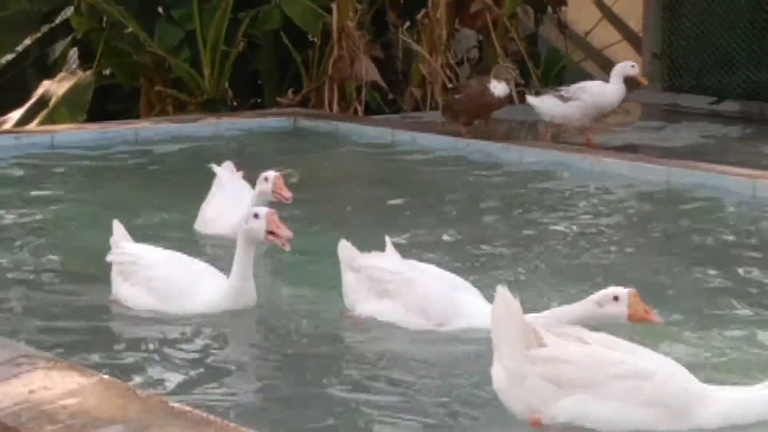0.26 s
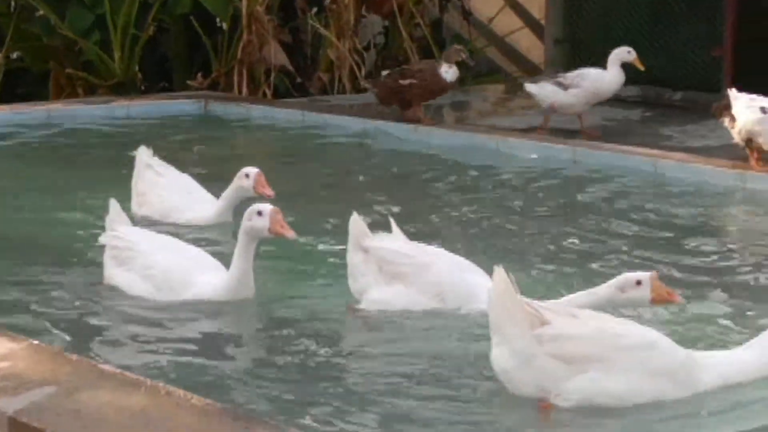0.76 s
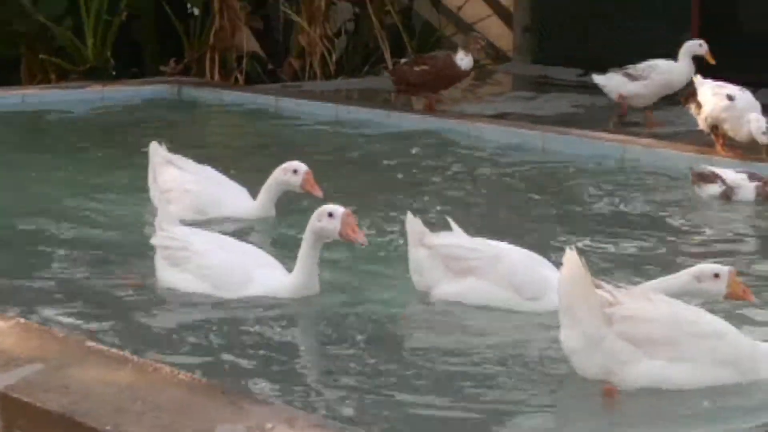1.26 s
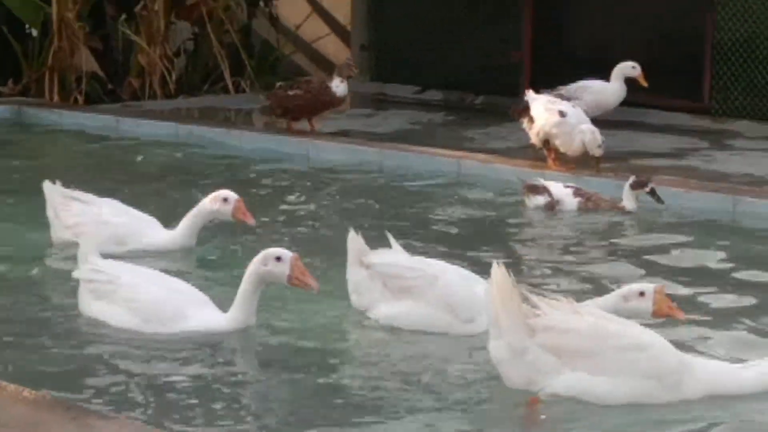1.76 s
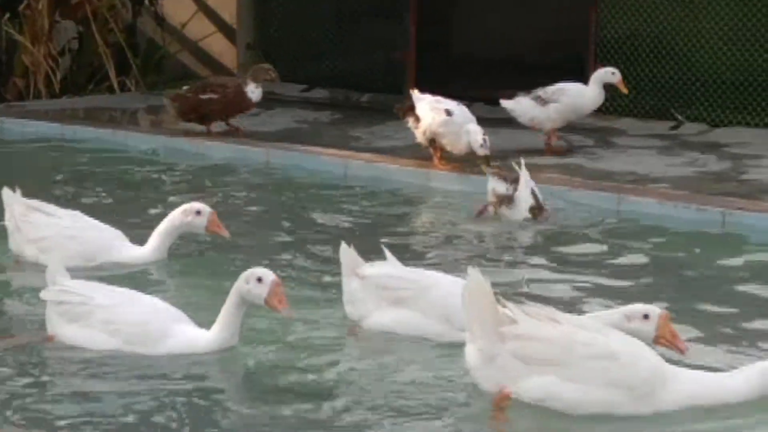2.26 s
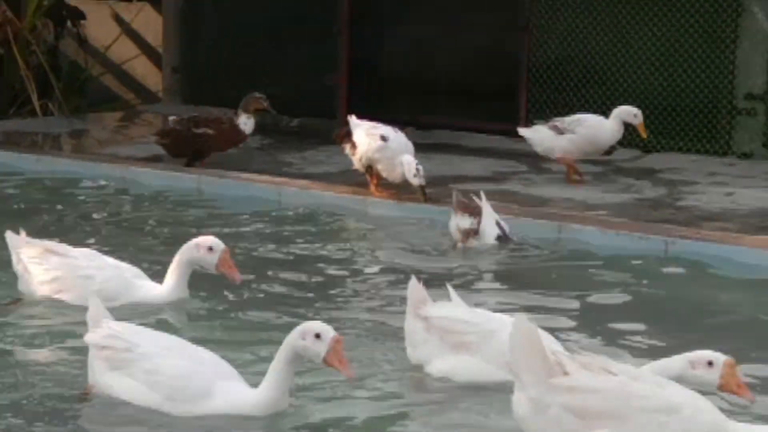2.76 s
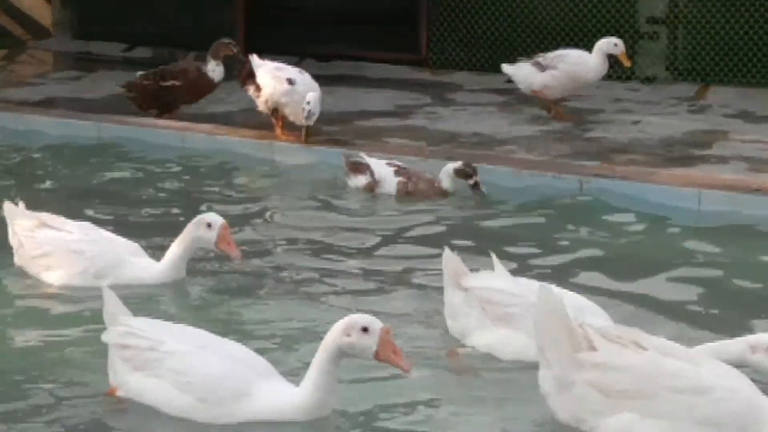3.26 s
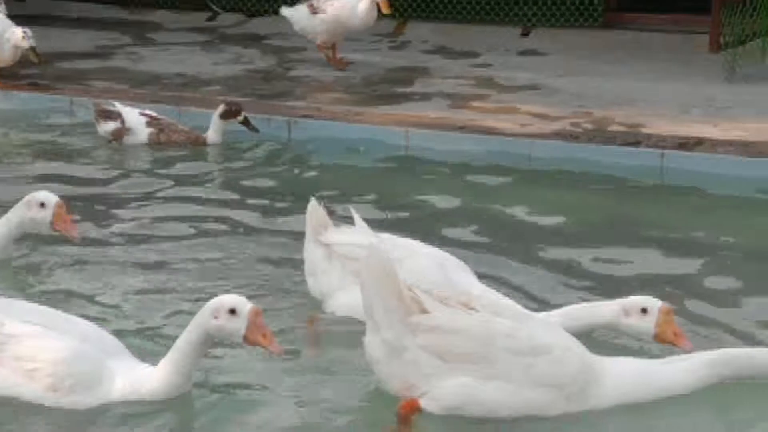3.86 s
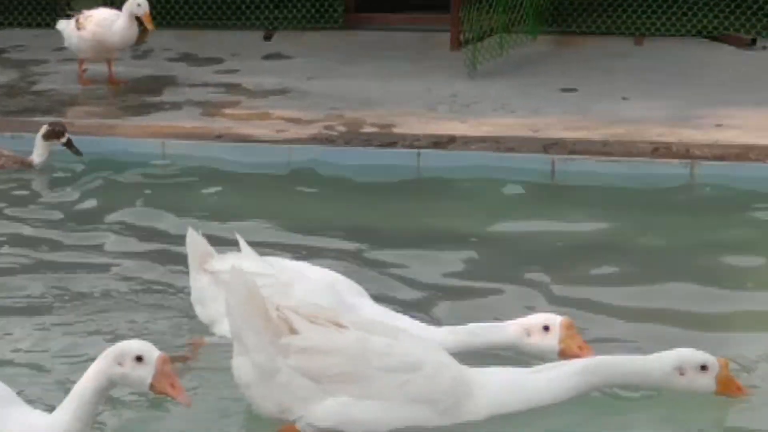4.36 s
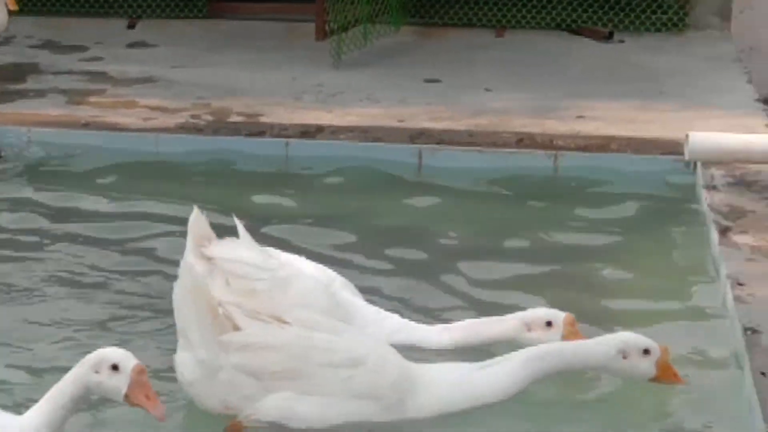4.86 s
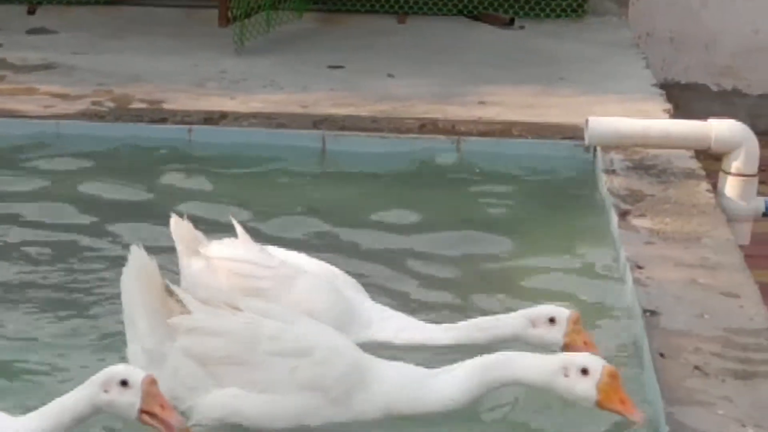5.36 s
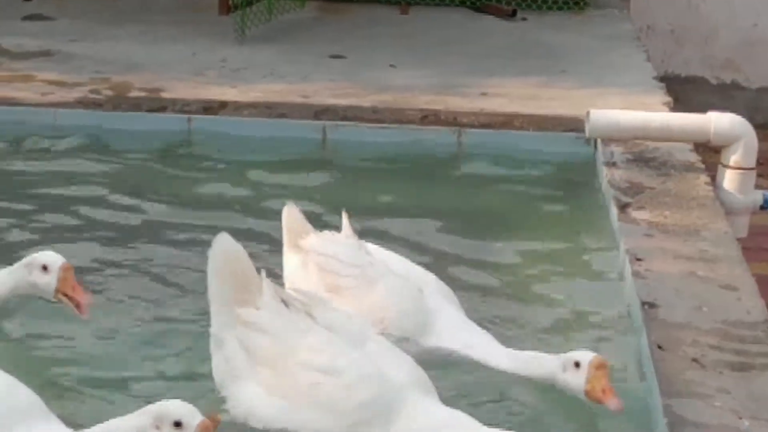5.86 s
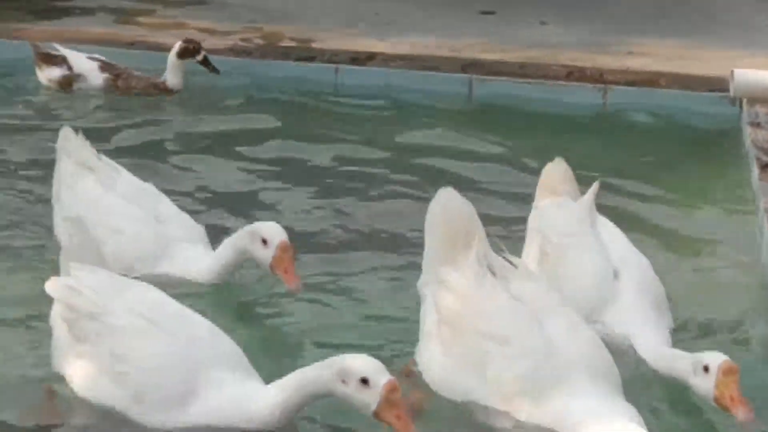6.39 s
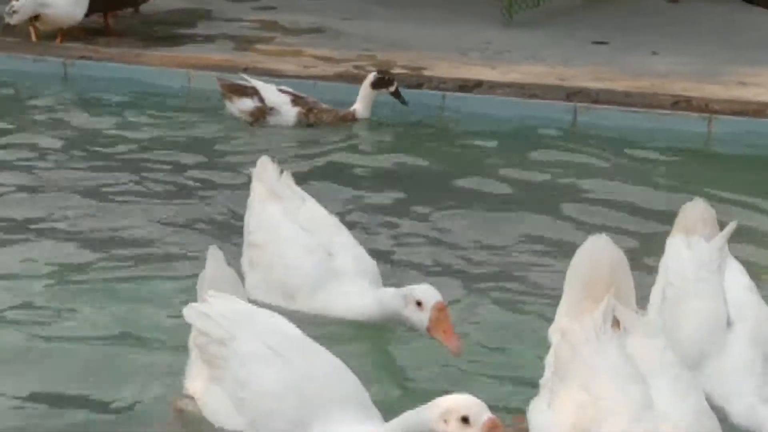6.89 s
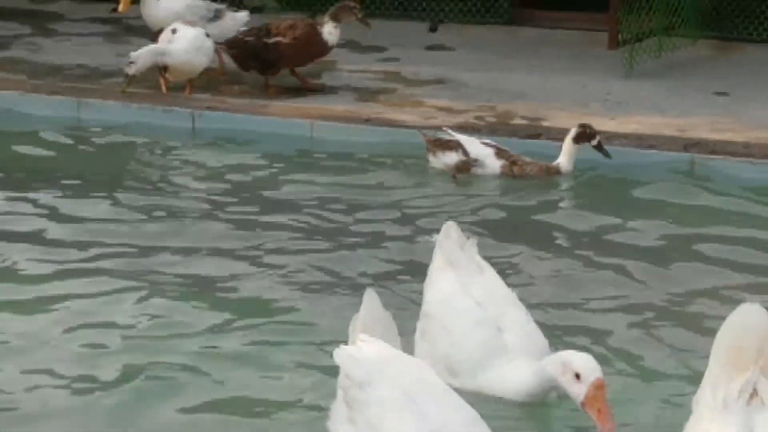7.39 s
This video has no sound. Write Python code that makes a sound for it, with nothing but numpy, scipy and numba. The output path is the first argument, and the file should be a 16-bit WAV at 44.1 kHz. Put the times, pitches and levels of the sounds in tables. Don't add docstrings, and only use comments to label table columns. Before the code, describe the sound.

Geese at a walled concrete pond give rasping, nasal honks close to a small microphone, loudest ones slightly overloaded. Scattered calls come first, with softer lowing from farther birds and a sharp click near the middle. Then hoarse squeals, barks and yelps crowd together. A low engine throb, faint outdoor murmur and light breeze lie underneath, with short yard echoes.

```python
import sys
import numpy as np
from scipy import signal
from scipy.fft import rfft, irfft, next_fast_len
from scipy.io import wavfile
from scipy.ndimage import uniform_filter1d, map_coordinates
from numba import njit

SR = 44100
rng = np.random.default_rng(int(sys.argv[2]) if len(sys.argv) > 2 else 0)


def log_audio(samples):
    frames = np.atleast_2d(samples).T
    limited = np.clip(frames, -1, 1)
    pcm = np.round(limited * 32767).astype(np.int16)
    wavfile.write(sys.argv[1], SR, pcm)


def invert_db(x):
    u = np.asarray(x, float) / 20
    return 10 ** u


N = 336483
TIME = np.arange(N) / SR

# [f/Hz, level/dB per Hz]
THROAT_HISS = [(1470, -4), (2500, 5.5), (3020, 2.5), (4000, 4), (4460, 1), (5260, 0.5), (6390, -1.5),
               (9090, -6), (9830, -11), (15100, -16.5), (16200, -28)]


def unit(x):
    return x / np.sqrt(np.mean(x ** 2) + 1e-20)


def level(x, span):
    power = uniform_filter1d(uniform_filter1d(x * x, size=span), size=span)
    return x / np.sqrt(np.abs(power) + 1e-12)


def along(points, hz):
    f, v = np.transpose(points)
    return np.interp(np.log(hz + 1), np.log(f + 1), v)


def curves(rows):
    s, *cols = np.transpose(rows)
    return [np.interp(TIME, s, c) for c in cols]


def wobble(rate):
    return map_coordinates(rng.standard_normal(int(N * rate / SR) + 4), [TIME * rate])


def filtered(x, response):
    m = next_fast_len(N + SR // 2)
    return irfft(rfft(x, m) * response(np.fft.rfftfreq(m, 1 / SR)), m)[..., :N]


def modes(table):
    def response(f):
        total = 0
        for k, (c, w, db) in enumerate(table):
            total = total + (-1) ** k * invert_db(db) * 1j * f * w / (c * c - f * f + 1j * f * w)
        return total
    return response


def patchy(x, depth_db, bins, frames):
    z = signal.stft(x, nperseg=512)[2]
    field = uniform_filter1d(uniform_filter1d(rng.standard_normal(z.shape), bins, 0), frames, 1)
    return signal.istft(z * invert_db(depth_db * unit(field)), nperseg=512)[1][:N]


@njit
def resonate(x, turn, damp):
    y = np.zeros(len(x))
    for i in range(2, len(x)):
        y[i] = x[i] - x[i - 2] + 2 * damp * np.cos(turn[i]) * y[i - 1] - damp * damp * y[i - 2]
    return y


def ring(x, hz, width_hz):
    return resonate(x, 2 * np.pi * hz / SR, np.exp(-np.pi * width_hz / SR))


def cavity(x, hz, width_hz, skirt_hz):
    return level(ring(ring(x, hz, width_hz), hz, skirt_hz), 900)


@njit
def tube(x, delay, echo):
    y = x.copy()
    for i in range(400, len(x)):
        y[i] += echo * y[i - delay[i]]
    return y


def air():
    # [f/Hz, level/dB per Hz]
    air_spectrum = [(15, -42), (25, -41), (196, -4.5), (479, -13), (739, -1), (969, -8), (1340, -3.5),
                    (1760, -11), (2500, -12), (3190, -12.5), (3650, -22), (4180, -27.5), (9950, -29),
                    (16200, -30)]
    # [t/s, level/dB, width/s]
    gusts = [
        (.36, -43, 0.044),
        (3.4, -28, .25),
        (5.5, -65.5, 0.25),
        (6.049, -51, 0.24),
        (6.761, -52.5, 0.25),
        (7.199, -22, 0.42),
    ]
    murmur = patchy(rng.standard_normal(N), depth_db=5, bins=2, frames=14)
    pair = np.array([unit(murmur), rng.standard_normal(N)])

    def share(f):
        low = 1 / (1 + (f / 4000) ** 6)
        return invert_db(along(air_spectrum, f)) * np.sqrt([low, 1 - low])

    hiss = unit(filtered(pair, share).sum(axis=0))
    buffet = unit(filtered(rng.standard_normal(N), lambda f: modes([(85, 60, 0)])(f) ** 2))
    strength = invert_db(-41) + sum(invert_db(db) * np.exp(-((TIME - s) / w) ** 2) for s, db, w in gusts)
    breeze = strength * invert_db(0.91 * wobble(8.2) - 20.5) * buffet
    return invert_db(-46 + 0.14 * wobble(4.3)) * hiss + breeze


def engine():
    # [t/s, firing rate/Hz, level/dB]
    running = [(0.0, 20.3, -76), (0.4, 24, -36), (0.778, 23, -39), (1.039, 21.2, -36.5), (1.572, 18, -33),
               (2.612, 27, -34.5), (3.288, 26, -29.5), (3.969, 18.4, -38.5), (4.292, 18, -32.5),
               (4.798, 27, -32), (5.189, 21.3, -33.5), (5.61, 23.6, -34), (6.668, 37, -28.5),
               (7.63, 34, -57)]
    # [f/Hz, width/Hz, level/dB]
    exhaust = [(120, 35, 9), (167.4, 100, 6), (211, 32.6, 9), (333, 100, -3.5)]
    rate, db = curves(running)
    firings = np.cumsum(rate * (1 + 0.0328 * wobble(14))) / SR
    thuds = np.diff(np.floor(firings), prepend=0) * invert_db(3.1 * wobble(25))
    pipe = filtered(filtered(thuds, modes(exhaust)), modes([(181, 180, 0)]))
    return invert_db(db - 10.0) * level(pipe, 9000)


def drops():
    # [t/s, peak level/dB]
    ticks = [(0.709, -14.5), (0.7397, -39), (0.753, -24), (0.7831, -30), (0.8071, -30), (0.881, -30),
             (0.914, -24), (1.0183, -15), (1.093, -24), (2.711, -19), (2.715, 2), (2.725, -8),
             (2.7522, -15), (2.765, -16), (6.2916, -42.5), (6.395, -32)]
    out, t = np.zeros(N + SR), np.arange(SR // 40) / SR
    pitches = 8300 * invert_db(1.4 * rng.standard_normal(len(ticks)))
    for (s, db), hz in zip(ticks, pitches):
        click = rng.standard_normal(len(t)) * (invert_db(-60 * t / 0.0011) + 0.2 * invert_db(-60 * t / 0.15))
        bubble = np.sin(2 * np.pi * hz * t) * invert_db(-60 * t / 0.0042)
        out[round(s * SR):][:len(t)] += invert_db(db) * (.37 * click + .36 * bubble)
    return filtered(out[:N], lambda f: (1j * f / (2000 + 1j * f)) ** 2 / (1 + (f / 13000) ** 4))


def yard(x):
    # [f/Hz, time to fall 60 dB/s]
    decay = [(300, 0.27), (1500, 0.31), (4000, 0.28), (7000, .2), (12000, .11)]
    hz, t, z = signal.stft(rng.standard_normal(SR * 3 // 4), SR, nperseg=256)
    tail = signal.istft(z * invert_db(-60 * t / along(decay, hz)[:, None]), SR, nperseg=256)[1]
    return signal.fftconvolve(np.pad(x, (400, 0)), tail / np.linalg.norm(tail))[:N]


def played(calls, edge):
    gate = 0
    for c in calls:
        opening, closing = (TIME - c[0][0]) / .008, (c[-1][0] - TIME) / edge
        gate = gate + np.clip(np.minimum(opening, closing) + .5, 0, 1)
    return [np.minimum(gate, 1)] + curves(np.concatenate(calls))


def squeals():
    # [t/s, pitch f/Hz, level/dB, brightness/dB per octave]
    squeal_calls = [
        [(0.58, 787, -53, -10), (0.608, 826, -34, -8), (0.812, 810.6, -37, -10), (0.83, 807, -55, -12),
         (0.95, 816, -45.5, 0)],
        [(4.13, 981, -26.5, -5), (4.23, 960, -23.5, -10), (4.296, 977, -20, -20), (4.37, 1034, -20.5, -7.5),
         (4.416, 1081, -24, -5), (4.46, 990, -17, -17)],
        [(4.47, 962, -15.5, -15), (4.486, 978, -13, -22), (4.53, 1085, -22, -67), (4.58, 1018, -9.5, -17)],
        [(5.075, 1150, -20.5, -9.5), (5.11, 1111, -20, -2), (5.17, 1131, -22, -1), (5.212, 1100, -19.5, -3.5),
         (5.25, 1166, -14.5, -4), (5.33, 1117, -14, -5.5), (5.444, 1059, -27, 2), (5.47, 1124, -8, -13)],
        [(6.035, 1136, -12, -1.5), (6.07, 1141, -19, -11), (6.088, 1142, -11, -3), (6.1, 1181, -23, -4),
         (6.126, 1203, -35, -8), (6.135, 1283, -8, -8.5), (6.146, 1254, -43, -1), (6.16, 1194, -53, -9)],
    ]
    # [multiple of the pitch, level/dB]
    overtones = [(1, 2.5), (2, -9), (3, -17), (4, -23), (5, -32), (6, -29), (7, -37), (8, -36), (9, -37),
                 (10, -40), (11, -40), (12, -42), (13, -45)]
    # [t/s, depth 0..1]
    flutter_depth = [(.96, 0), (4.13, .6), (4.3, .35), (4.58, .35), (5.21, .03), (5.25, .5), (5.3, .65),
                     (5.47, .9), (6.03, .6), (6.16, .7)]
    gate, pitch, db, tilt_db = played(squeal_calls, .03)
    depth = curves(flutter_depth)[0]
    turn = 2 * np.pi * np.cumsum(pitch * (1 + 0.00483 * wobble(150) + 0.0029 * wobble(30))) / SR
    flutter = turn / 6 + .4 * wobble(60)
    drag = depth * (.6 * np.sin(flutter) + (.1 + .25 * depth) * wobble(130))

    def mouth(hz):
        palate = 3 / (1 + ((hz - 3350) / 180) ** 2)
        return 1 + 3.2 / (1 + ((hz - 2030) / 90) ** 2) + depth * palate

    stack = 0
    for k, db_k in overtones:
        gain = invert_db(db_k + (tilt_db + 5.0) * np.log2(k) + 2.53 * wobble(90))
        stack = stack + mouth(k * pitch) * gain * np.sin(k * turn - k ** 1.19 * drag)
    stack += invert_db(-14) * np.exp(-((depth - .2) / 0.1) ** 2) * np.sin(turn / 2)
    breath = filtered(rng.standard_normal(N), lambda f: invert_db(along(THROAT_HISS, f)) / (1 + (f / 3800) ** 4))
    hiss = unit(breath) * (1 + np.cos(turn))
    beating = level(np.exp(depth * np.cos(flutter)), 900)
    return gate * invert_db(db) * beating * (stack + invert_db(tilt_db - 36 + 18 * depth) * hiss)


def phrase(rows, swell_db_s, held, fade_db, onset, end, beak_hz, neck_db, pipe_db, rasp_db, closing_db,
           crack_db=-60, crack_lead_s=0, rasp_yield=.19, early_glide=.75):
    shut, wide, last = beak_hz
    closing = np.array([0, 0.06, 0.11, 0.37, 0.95])
    glide = np.array([onset, onset + early_glide * (1 - onset), 1, 1 + .4 * (end - 1), end])
    beak = [shut, shut + .68 * (wide - shut), wide, (wide + last) / 2, last]
    yields = (0.84, 0.47, rasp_yield)
    calls = []
    for start, swell, length, peak_db, pitch in rows:
        rest = length - swell
        s = start + np.array([0, swell / 2, swell, swell + held * rest, length])
        rise_db = swell_db_s * swell
        effort = peak_db - np.array([rise_db, .43 * rise_db, 0, fade_db / 8, fade_db])
        tract = [db - give * (effort + 20) + extra * closing
                 for db, give, extra in zip((neck_db, pipe_db, rasp_db), yields, closing_db)]
        cracked = np.clip((s - start - swell + crack_lead_s) / 0.0033, -1, 1)
        crack = crack_db + 0.25 * (peak_db + 8) + 12 * (cracked - 1)
        calls.append(np.transpose([s, effort, pitch * glide, beak, *tract, crack]))
    return calls


def flock(calls, facing=((0, 0),), stoop=((0, 0),)):
    turned = np.array([0.0017, 0.13, 0.022, 1.0, 0.74, 0.57, 1.0, 0.47])
    stooped = np.array([0, 0, 0, 0, 1, 0, 0, 0])

    def posed(c):
        facing_db, stoop_db = (np.interp(c[:, :1], *np.transpose(curve)) for curve in (facing, stoop))
        return c + facing_db * turned + stoop_db * stooped

    return [posed(c) for c in sorted(calls, key=lambda c: c[0, 0])]


def syrinx(calls, pitch, slack, jitter, scatter_db, puff):
    cycles = np.cumsum(pitch * (1 + slack * jitter * wobble(70) + 1.2 * jitter * wobble(16))) / SR
    opens = np.array([0] + [round((c[0, 0] - .001) * SR) for c in calls])
    call = np.searchsorted(opens, np.arange(N), 'right') - 1
    cycles = cycles + (np.ceil(cycles[opens]) - cycles[opens])[call] + call
    strength = invert_db(scatter_db * rng.standard_normal(N // 100))[cycles.astype(int)]
    burst = strength * np.exp(-(cycles % 1) / puff)
    shut = strength * (np.diff(np.floor(cycles), prepend=0) > 0)
    late = np.clip(cycles % 1 * SR / pitch, 0, 1)
    snaps = unit(shut * (1 - late) + np.roll(shut * late, -1))
    return cycles, burst, snaps


def throat_rasp(hiss, bill_hz, tongue, hollow):
    round_trip = np.clip(SR / bill_hz * (1 + 0.13 * wobble(2.2)), 10, 390).astype(np.int64)
    rough = patchy(tube(hiss, round_trip, .3), depth_db=1.8, bins=9, frames=8)
    rasp = level(filtered(rough, lambda f: invert_db(along(THROAT_HISS, f))), 900)
    lower = filtered(rasp, lambda f: 1 / (1 + (f / 5600) ** 12))
    rasp = rasp + (invert_db(curves(tongue)[0]) - 1) * lower
    pocket_hz, share = curves(hollow)
    width_hz = 800
    unity = (1 - np.exp(-2 * np.pi * width_hz / SR)) / 2
    return rasp - share * unity * ring(rasp, pocket_hz, width_hz)


def honks(calls, jitter, scatter_db, breath, beak_width_hz, neck_hz, neck_width_hz, chest_db, puff, bill_hz,
          gape_db, coupled, dull_db, nose, pipe_hz, hollow, buzz, cut_hz, tongue=((0, 0),)):
    gate, beak_db, pitch, beak_hz, neck_db, upper_db, rasp_db, crack_db = played(calls, 0.014)
    slack = np.clip(invert_db(-.35 * (beak_db + 20)), .7, 1.3)
    cycles, burst, snaps = syrinx(calls, pitch, slack, jitter, scatter_db, puff)
    source = snaps + slack * breath * unit(burst * rng.standard_normal(N))
    beak = cavity(source, beak_hz, beak_width_hz, 710)
    crack = cavity(source, np.full(N, 1662.0), 7.2, 370)

    neck_track = curves(neck_hz)[0] * (pitch / 160) ** .45
    steep = filtered(source, lambda f: (f * f / (cut_hz ** 2 - f * f + .9j * f * cut_hz)) ** 2)
    neck = cavity(steep, neck_track, neck_width_hz, 1320)

    nose_db, low_hz, high_hz = curves(nose)
    nasal = 0
    for hz, gain in ((low_hz, .75), (high_hz, .6)):
        snuffle = source + .5 * unit(burst * rng.standard_normal(N))
        nasal = nasal + gain * cavity(snuffle, hz, 173, 560)

    pipe_track = curves(pipe_hz)[0]
    shaken = pipe_track * (1 + 0.043 * wobble(25))
    windpipe = level(ring(ring(source, shaken, 170), pipe_track, 350), 900)

    hiss = unit(burst ** 1.2 * rng.standard_normal(N)) + buzz * snaps
    rasp = throat_rasp(hiss, bill_hz, tongue, hollow)
    chest = np.sin(2 * np.pi * cycles) + 0.34 * np.sin(4 * np.pi * cycles)

    loud = beak + invert_db(crack_db) * crack + invert_db(neck_db) * neck + invert_db(upper_db) * windpipe
    loud += invert_db(rasp_db + dull_db + 2.4 * wobble(45)) * rasp
    nasal_db = coupled * upper_db + (1 - coupled) * rasp_db + gape_db + nose_db
    loud += invert_db(nasal_db + 2 * wobble(14)) * nasal
    return gate * (invert_db(beak_db) * loud + invert_db(chest_db + 0.37 * beak_db) * chest)


def far_geese():
    # [start t/s, swell/s, whole length/s, peak level/dB, top pitch f/Hz]
    grunts = [
        (.985, 0.0272, .075, -28.5, 145.2),
    ]
    croaks = [
        (4.132, 0.0927, 0.18, -21.5, 148.7),
    ]
    lowing = [
        (1.06, .19, .28, -26.5, 159.3),
    ]
    piping = [
        (2.274, .17, .365, -19.5, 146.5),
    ]
    gabble = [
        (3.5, 0.11, 0.264, -29.5, 150.9),
        (7.357, .26, 0.29, -15, 153.1),
    ]
    peeps = [
        (2.245, 0.0148, 0.023, -21, 125.6),
    ]
    # [t/s, opening level/dB, lower cavity f/Hz, upper cavity f/Hz]
    nostrils = [(1.0, 0, 2600, 3100), (1.15, 2, 2330, 3050), (1.21, 15, 2400, 2850), (1.26, 17, 2400, 3270),
                (1.33, 9, 2700, 3200), (2.3, -25, 2300, 2660), (2.4, -8, 2350, 2700), (2.55, 4, 2382, 3100),
                (3.6, -7, 2700, 3130), (4.2, -1, 2600, 3200), (6.1, -3, 2660, 3500), (7.4, -6, 2340, 2720),
                (7.5, -1, 2550, 2820), (7.6, 1.5, 2420, 3080)]
    # [t/s, f/Hz]
    neck_track = [(1.0, 870), (1.1, 800), (1.3, 654), (2.3, 920), (2.4, 910), (2.46, 640), (2.56, 650),
                  (2.62, 895), (3.6, 945), (4.2, 930), (7.4, 960.4), (7.6, 1043)]
    # [t/s, f/Hz]
    pipe_track = [(1.0, 1980), (1.15, 2020), (1.26, 2100), (1.33, 1900), (2.3, 1900), (2.45, 1800),
                  (2.6, 2050), (3.6, 1930), (4.2, 1950), (7.37, 2120), (7.45, 2020), (7.6, 2120)]
    # [t/s, f/Hz, share 0..1]
    pocket = [(1.0, 3700, .9), (1.3, 3700, .8), (2.3, 3100, 0.67), (2.5, 3890, 0.91), (3.65, 3600, 0.5),
              (6.1, 4200, 0.77), (7.4, 3440, 0.71), (7.6, 3730, 0.68)]
    calls = phrase(grunts, swell_db_s=40, held=0.31, fade_db=25, onset=.92, end=1.2, beak_hz=(1900, 1760, 1900),
                   neck_db=0, pipe_db=-27, rasp_db=-44, closing_db=(-6.5, -28, -3))
    calls += phrase(croaks, swell_db_s=26, held=0.57, fade_db=9, onset=0.94, end=1.05,
                    beak_hz=(2140, 1880, 1950), neck_db=6.5, pipe_db=-35, rasp_db=-39, closing_db=(-58, 2, -5))
    calls += phrase(lowing, swell_db_s=32, held=0.3445, fade_db=10, onset=0.95, end=0.96,
                    beak_hz=(1000, 1090, 1020), neck_db=-9.5, pipe_db=-10, rasp_db=-8.5,
                    closing_db=(0, 5, -5), rasp_yield=-1.7)
    calls += phrase(piping, swell_db_s=17, held=0.7, fade_db=14, onset=.875, end=0.995,
                    beak_hz=(1650, 1700, 1500), early_glide=.25,
                    neck_db=-6, pipe_db=-12, rasp_db=-17, closing_db=(3, 4, 6))
    calls += phrase(gabble, swell_db_s=25, held=0.36, fade_db=10, onset=0.9, end=1.01,
                    beak_hz=(1540, 1610, 1700), early_glide=0.46,
                    neck_db=4, pipe_db=3, rasp_db=-5, closing_db=(-4.5, -6, -3))
    calls += phrase(peeps, swell_db_s=37, held=0.62, fade_db=-3, onset=0.98, end=0.87,
                    beak_hz=(1760, 1760, 1600), neck_db=-39, pipe_db=-27, rasp_db=-33, closing_db=(-4, -3, 0))
    calls += phrase([(6.06, 0.0284, 0.088, -8.5, 185.7)], swell_db_s=63, held=0.23, fade_db=28, onset=.95,
                    end=0.91, beak_hz=(2140, 2260, 2600), neck_db=-20, pipe_db=-12, rasp_db=-33,
                    closing_db=(-2, 0, 0))
    return honks(flock(calls), jitter=.0045, scatter_db=1.3, breath=.26, beak_width_hz=220,
                 neck_hz=neck_track, neck_width_hz=320, chest_db=-33.5, puff=0.99, bill_hz=1087, gape_db=0.5,
                 coupled=0, dull_db=-2.5, nose=nostrils, pipe_hz=pipe_track, hollow=pocket, buzz=0.36, cut_hz=544)


def near_geese():
    # [start t/s, swell/s, whole length/s, peak level/dB, top pitch f/Hz]
    blares = np.column_stack([(1.53, 1.96, 4.467, 4.841, 7.115), [(.1, .19, -8, 187), (.09, .21, -18, 172),
              (.14, .3, -8, 187), (.08, .23, -6, 187), (.095, .2, -4.5, 184)]])
    barks = np.column_stack([(3.779, 5.34, 5.53, 6.586), [(.096, .173, -10.5, 187), (.08, .18, -14, 164),
             (.078, .17, -4.5, 197), (.18, .243, -1.5, 192)]])
    shrieks = [
        (.215, .136, .195, -7.5, 185.8),
    ]
    leads = np.column_stack([(1.358, 1.786, 2.816, 3.186, 4.15, 7.014), [(.1, .163, -24, 163),
             (.06, .074, -23, 152), (.1, .105, -21.5, 157), (.18, .185, -17, 172), (.105, .16, -23, 161),
             (.075, .1, -18.5, 163)]])
    trails = [
        (2.925, .055, 0.17, -18.5, 146.5),
        (3.38, 0.033, 0.13, -20.5, 142),
    ]
    snap_calls = np.column_stack([(.069, .468, 5.941), [(.088, .108, -8, 172), (.072, .11, -6, 171),
                  (.072, .1, -3.5, 184)]])
    wails = [
        (5.728, .036, .143, -2.5, 197),
    ]
    usual_beak = (1315, 1338, 1315)
    # [t/s, level/dB]
    beaks_turned = [(.1, 1.5), (.17, 2.5), (.24, -7), (.35, 0.5), (.53, -1.5), (1.42, 5), (1.63, -3.5),
                    (1.87, 1), (2.07, -5.5), (2.95, -1), (3.3, 2.5), (3.87, -0.5), (4.2, 12), (4.6, -0.5),
                    (4.93, -7), (5.43, 0.5), (5.8, 0.5), (6.75, 3), (7.03, -5), (7.14, 6.5), (7.25, -2)]
    # [t/s, level/dB]
    necks_low = [(.1, -26.5), (.3, 3.5), (.53, -21), (1.42, -11.5), (1.63, -11.5), (1.87, -9), (2.07, -3.5),
                 (2.95, -8.5), (3.3, -6.5), (3.87, -0.5), (4.2, -20.5), (4.6, -0.5), (4.93, 2), (5.43, 2.5),
                 (5.8, 0), (6.0, -11), (6.75, -2.5), (7.1, -5.5), (7.25, -5.5)]
    # [t/s, opening level/dB, lower cavity f/Hz, upper cavity f/Hz]
    nostrils = [(.1, -7, 2450, 4030), (.3, 10, 3300, 4050), (.37, -5, 3270, 4130), (.55, 8, 3350, 4120),
                (1.42, -7, 2360, 4150), (1.66, 15.5, 2750, 3330), (1.9, -3, 3350, 3960),
                (2.07, 15, 2600, 3500), (2.95, -17, 2300, 4400), (3.3, -16, 2600, 4370),
                (3.87, -29, 2700, 4200), (4.2, -18, 2600, 4300), (4.62, 4, 2697, 4260),
                (4.93, 13, 2500, 3388), (5.43, -15, 2630, 3330), (5.65, 9, 2600, 3300),
                (5.82, 9, 2710, 4120), (6.0, -3, 2600, 4120), (6.75, -11, 3280, 4100),
                (7.06, -3, 2470, 4116), (7.15, -7, 2710, 4170), (7.24, 13, 3440, 3850)]
    # [t/s, f/Hz]
    neck_track = [(.1, 765), (.53, 800), (1.4, 835), (1.63, 890), (1.85, 830), (2.07, 891), (2.95, 920),
                  (3.3, 860), (3.87, 910), (4.6, 876), (4.93, 836), (5.43, 940), (5.8, 824), (6.75, 841.6),
                  (7.06, 869), (7.25, 910)]
    # [t/s, f/Hz]
    pipe_track = [(.1, 2140), (.35, 2020), (1.4, 1760), (1.5, 1900), (1.63, 2270), (1.86, 1760),
                  (2.05, 2200), (2.87, 1690), (3.0, 2052), (3.25, 1670), (3.4, 1930), (4.2, 1900),
                  (4.6, 1820), (5.43, 1874), (6.0, 2090), (6.75, 2037), (7.06, 1930), (7.2, 2064)]
    # [t/s, level/dB]
    tongue_shade = [(.1, -8.5), (.17, -0.5), (.33, 7.5), (.5, -8), (.56, 0), (1.42, 4.5), (1.63, -2.5),
                    (2.0, 2.5), (2.95, 1.5), (3.3, 3), (3.87, 1), (4.2, -3), (4.6, 0), (5.43, 2.5),
                    (5.8, -1.5), (6.0, -1.5), (6.75, -2), (7.2, 1.5)]
    # [t/s, f/Hz, share 0..1]
    pocket = [(.1, 2800, 0.34), (.25, 2650, 0.53), (.35, 2920, 0.27), (1.42, 3050, 0.72), (1.66, 3900, .4),
              (1.82, 3680, 1), (1.9, 2980, 0.86), (2.85, 3260, .9), (3.0, 3530, 0.68), (3.25, 3268, 0.63),
              (3.8, 3330, 0.57), (3.9, 3500, 0.17), (4.2, 3560, 1), (4.6, 3850, 0.31), (4.93, 3876, 0.41),
              (5.43, 3800, .8), (5.8, 3334, .5), (6.62, 3040, 0.93), (6.75, 3480, 0.35), (7.05, 2980, 0.36),
              (7.24, 2950, 0.66)]
    calls = phrase(blares, swell_db_s=136, held=.45, fade_db=16.5, onset=.8, end=.9, beak_hz=usual_beak,
                   neck_db=4.5, pipe_db=-10, rasp_db=-13.5, closing_db=(0.5, 0, 4), crack_db=-8)
    calls += phrase(barks, swell_db_s=120, held=.4, fade_db=9, onset=.75, end=.93, beak_hz=usual_beak,
                    neck_db=4, pipe_db=-17, rasp_db=-12, closing_db=(-12, -48, 3.5), crack_db=-7.5)
    calls += phrase(shrieks, swell_db_s=116.5, held=.3, fade_db=18, onset=.92, end=1.01,
                    beak_hz=(1000, 1230, 1560), neck_db=3, pipe_db=-6, rasp_db=-8.5,
                    closing_db=(-7, 8, 12.5), crack_db=7, crack_lead_s=0.034)
    calls += phrase(leads, swell_db_s=80, held=.3, fade_db=5.5, onset=.79, end=0.93, beak_hz=usual_beak,
                    neck_db=5.5, pipe_db=-7.5, rasp_db=-11, closing_db=(3.5, 11, -12.5))
    calls += phrase(trails, swell_db_s=32, held=0.16, fade_db=18.5, onset=.93, end=.92,
                    beak_hz=(1630, 1280, 1360), neck_db=8.5, pipe_db=-2.5, rasp_db=-9.5,
                    closing_db=(-10.5, 0.5, -1.5))
    calls += phrase(snap_calls, swell_db_s=26, held=0.38, fade_db=13.5, onset=.88, end=1, beak_hz=usual_beak,
                    neck_db=15, pipe_db=-9, rasp_db=-11, closing_db=(-21, -26, 10.5), crack_db=2.5)
    calls += phrase(wails, swell_db_s=420, held=.45, fade_db=2, onset=.92, end=1.01, beak_hz=(1300, 1400, 2050),
                    neck_db=3, pipe_db=-6, rasp_db=-10, closing_db=(0, 4, 6), crack_db=-6)
    calls += phrase([(1.864, 0.028, .09, -19.5, 162.8)], swell_db_s=20, held=0.16, fade_db=-1, onset=.93,
                    end=.92, beak_hz=(1630, 1280, 1360), neck_db=1.5, pipe_db=-2.5, rasp_db=-9.5,
                    closing_db=(1, -2.5, -17))
    return honks(flock(calls, beaks_turned, necks_low), jitter=.012, scatter_db=2.5, breath=.5,
                 beak_width_hz=48, neck_hz=neck_track, neck_width_hz=230, chest_db=-27.0, puff=0.67, bill_hz=832,
                 gape_db=-9.5, coupled=0.037, dull_db=1.5, nose=nostrils, pipe_hz=pipe_track, hollow=pocket,
                 buzz=0.48, cut_hz=624, tongue=tongue_shade)


def scene():
    background = air() + engine() + drops()
    thin, far, near = squeals(), far_geese(), near_geese()
    echoes = yard(invert_db(-12) * near + invert_db(-11) * far + invert_db(-11) * thin)
    return (invert_db(-3.5) * near + invert_db(-9.0) * far + thin + echoes + background)[None]


def band_limit(x):
    return signal.sosfilt(signal.butter(12, 16360, fs=SR, output="sos"), x)


def record(dry):
    driven = dry * 1.08
    clipped = driven / (1 + np.abs(driven) ** 12) ** (1 / 12)
    thinned = filtered(clipped, lambda f: np.abs(f / (32 + 1j * f)) ** 3)
    return band_limit(np.clip(thinned, -1, 1))


dry = scene()
out = record(dry)
log_audio(out)
```